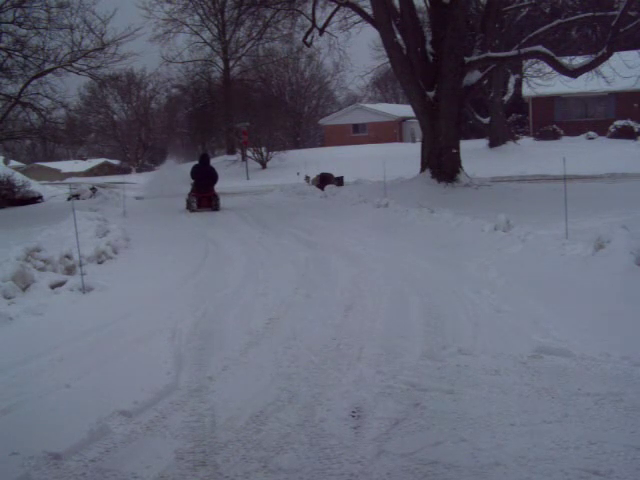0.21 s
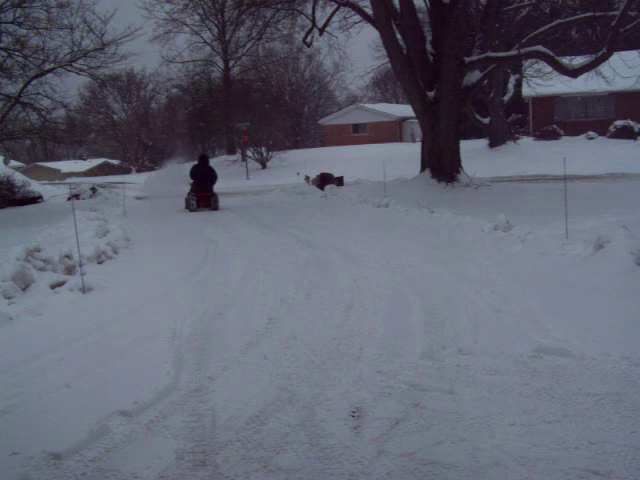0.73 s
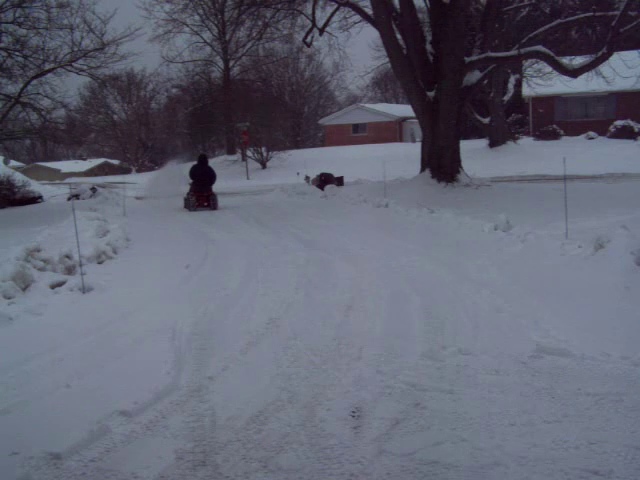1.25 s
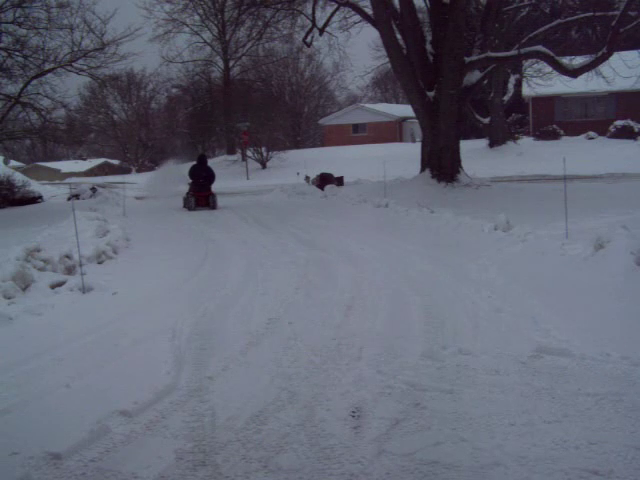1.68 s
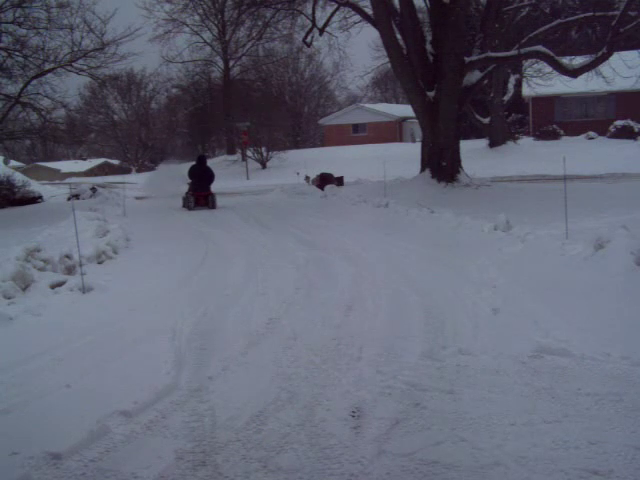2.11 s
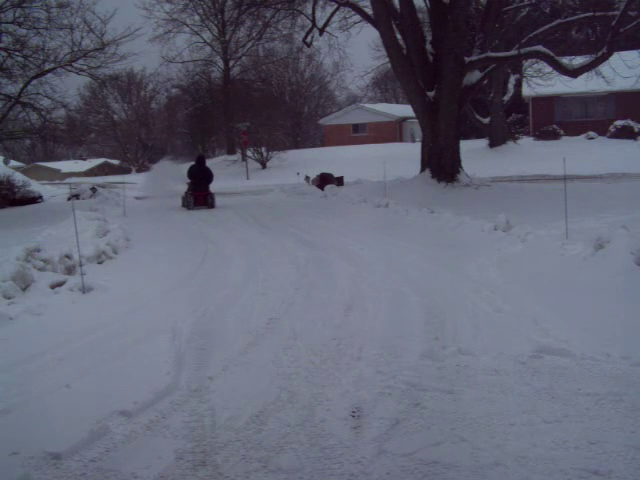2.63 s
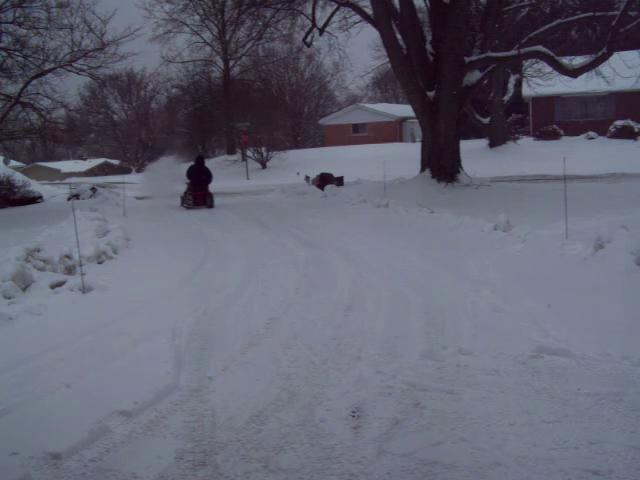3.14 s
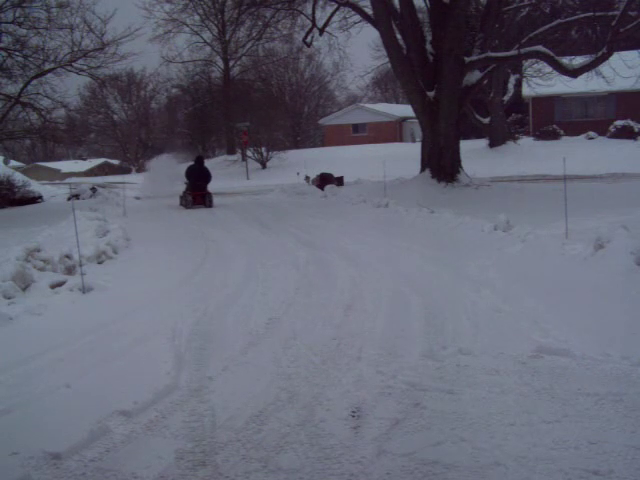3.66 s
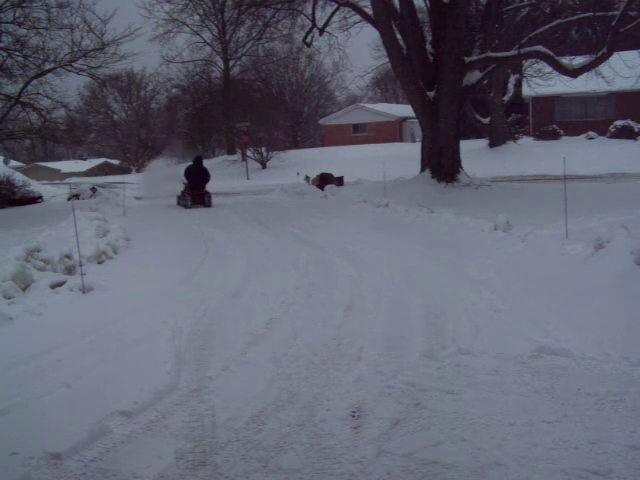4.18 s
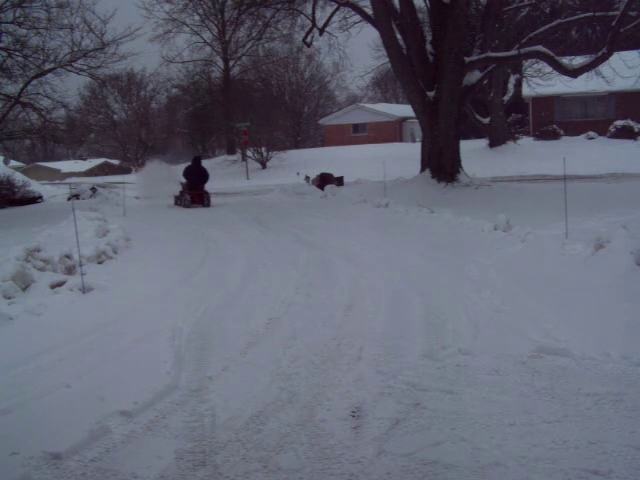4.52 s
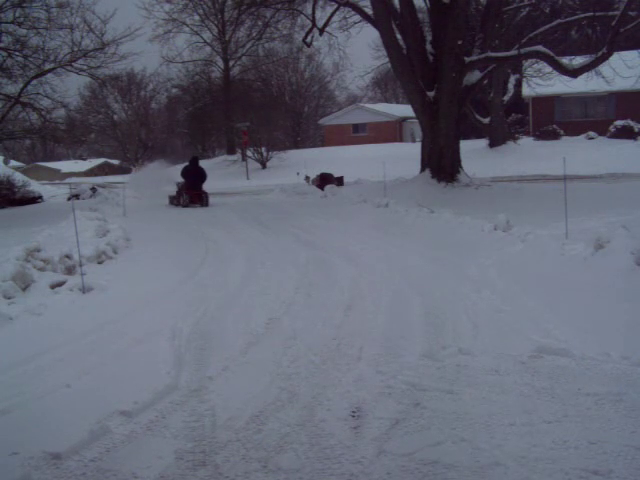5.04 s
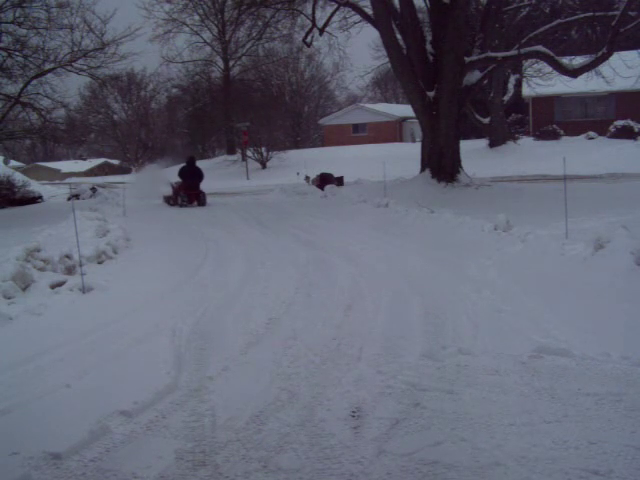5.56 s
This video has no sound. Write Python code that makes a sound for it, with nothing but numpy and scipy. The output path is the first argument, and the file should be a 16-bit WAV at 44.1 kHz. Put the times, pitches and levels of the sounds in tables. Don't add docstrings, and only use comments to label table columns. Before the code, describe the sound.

Distant tractor snowthrower under constant load: buzzing low putter, rushing hiss of thrown snow, small bright ticks, and faint low bumps on a handheld camera.

```python
import sys
import numpy as np
from scipy import signal
from scipy.io import wavfile
from scipy.ndimage import uniform_filter1d

SR = 44100
rng = np.random.default_rng(int(sys.argv[2]) if len(sys.argv) > 2 else 0)


def put_to_file(sound):
    columns = np.atleast_2d(sound).T
    safe = np.clip(columns, -1, 1)
    whole_steps = np.round(safe * 32767)
    wavfile.write(sys.argv[1], SR, whole_steps.astype(np.int16))


def linear_from_db(decibels):
    return 10 ** (np.asarray(decibels, float) / 20)


N = 255339

# start_s [s], speed_rpm [rev/min]
SPEED = [(0.0, 2640.1), (0.15, 2688.1), (0.45, 2709.2), (0.75, 2694.0), (0.9, 2721.0), (1.65, 2711.0),
         (1.95, 2723.3), (2.4, 2686.1), (3.0, 2746.9), (3.15, 2735.3), (3.45, 2748.9), (3.75, 2711.8),
         (4.5, 2659.5), (4.8, 2671.4), (5.79, 2672.3)]
START_CYCLE = .025


def crank():
    start_s, speed_rpm = np.transpose(SPEED)
    rpm = np.interp(np.arange(N) / SR, start_s, speed_rpm)
    return START_CYCLE + np.cumsum(rpm) / 120 / SR


# order [multiple of the firing rate], level_db [dB]
FACING = [(1, -37), (2, -28), (3, -29), (4, -11), (5, -13), (6, 0), (7, -3), (8, -3), (9, -13), (10, -11),
          (11, -10), (12, -27), (13, -17), (14, -21), (15, -22), (16, -21), (17, -14), (18, -13), (19, -26),
          (20, -23), (21, -16)]
# order [multiple of the firing rate], level_db [dB]
ASIDE = [(1, -39), (2, -30), (3, -30), (4, -10), (5, -9), (6, 0), (7, -1), (8, -3), (9, -8), (10, -10),
         (11, -9), (12, -18), (13, -19), (14, -15), (15, -16), (16, -21), (17, -22), (18, -20), (19, -23),
         (20, -21), (21, -16)]
STROKES = [
    (1, .021, 0, 0, 0),
    (10, .035, -.27, 0, 0),
    (13, .63, .17, 1, .14),
    (22, 0, 0, 1, 1),
]
# pitch_hz [Hz], width_hz [Hz], lift_db [dB]
PANELS = [(253, 6, 7), (390, 12, 9), (412, 8, 3)]
EXHAUST_DB, EXHAUST_ASIDE_DB = -19, -2
GULP_DB, GULP_ASIDE_DB = -0.33, 0.5
RATTLE_ORDERS, RATTLE_DB = range(22, 31), -27


def engine(cycles):
    aside = np.clip(turned(), 0, 1)
    firing_hz = np.gradient(cycles) * SR
    gulp_db = GULP_DB + GULP_ASIDE_DB * aside
    rattle = [(order, RATTLE_DB) for order in RATTLE_ORDERS]
    slip = .05
    out = np.zeros(N)
    for (order, front_db), (_, side_db) in zip(FACING + rattle, ASIDE + rattle):
        stroke = [row for row in STROKES if row[0] <= order][-1]
        _, place, lag, gulp_share, scatter = stroke
        lag = lag + scatter * rng.standard_normal()
        unsteady = .028 * order
        db = front_db + aside * (side_db - front_db) + gulp_share * gulp_db
        db = db + 1.6 * unsteady * wander(3)
        swell_db = np.zeros(N)
        for pitch_hz, width_hz, lift_db in PANELS:
            swell_db += lift_db / (1 + (2 * (order * firing_hz - pitch_hz) / width_hz) ** 2)
        db += swell_db - swell_db.mean() - 5 * scatter
        if order < 4:
            db -= 3
        turns = order * (cycles - place) - lag + slip * unsteady * wander(4.9)
        out += linear_from_db(db) * np.cos(2 * np.pi * turns)

    charge_db = 0.51 * rng.standard_normal(200)[(cycles + .5).astype(int)]
    level_db = EXHAUST_DB + EXHAUST_ASIDE_DB * aside + uniform_filter1d(charge_db, 400)
    power = uniform_filter1d(uniform_filter1d(out ** 2, SR // 2), SR // 4)
    return linear_from_db(level_db) * out / np.sqrt(power)


TURN_S, TURN_LENGTH_S, TURN_SHARE = 4.1, 0.37, 0.98


def turned():
    u = np.clip((np.arange(N) / SR - TURN_S) / TURN_LENGTH_S + .5, 0, 1)
    return TURN_SHARE * np.sin(np.pi * u / 2) ** 2


# pitch_hz [Hz], level_db [dB per Hz]
HISS_COLOUR = [(700, -27.5), (1000, -13.5), (1500, -12), (2300, -12), (3300, -10), (4600, -13),
               (5800, -20.5), (7800, -33.5), (8700, -51), (9100, -74.5)]
# pitch_hz [Hz], width_hz [Hz], lift_db [dB above the hiss]
HOUSING = [(1020, 60, 3), (1225, 70, 5), (1955, 60, 6), (2760, 220, 4), (7100, 300, 3)]
PUFFS = [(.94, .04, 1.42), (.29, 0.074, .8), (.7, .15, 0.27)]
HISS_DB, HISS_RISE_DB_PER_S, HISS_ASIDE_DB = -18.5, 0.04, .5


def hiss(cycles):
    sizes = linear_from_db(4 * rng.standard_normal((200, len(PUFFS))))
    gate = np.zeros(N)
    for k, (place, width, strength) in enumerate(PUFFS):
        shifted = cycles - place + 1.5
        shape = np.exp(-((shifted % 1 - .5) / width) ** 2)
        gate += strength * sizes[shifted.astype(int), k] * shape
    steady = yard(noise(HISS_COLOUR, HOUSING, patchy_db=0.7))
    highpass = signal.butter(2, 8200, "high", fs=SR, output="sos")
    treble = signal.sosfiltfilt(highpass, steady)
    puffed = steady * (1 + .13 * gate + .07 * wander(250))
    puffed += treble * (1.2 * gate + .4 * wander(130))
    level_db = HISS_DB - 5.0 + HISS_RISE_DB_PER_S * np.arange(N) / SR + HISS_ASIDE_DB * turned()
    return linear_from_db(level_db) * evened(puffed)


IMPELLER_HZ, IMPELLER_DB = 301.8, -38


def impeller():
    hz = IMPELLER_HZ + 1.3 * wander(3.6)
    level_db = IMPELLER_DB + 3.0 - 4.5 * turned() + 1.4 * wander(4.5)
    return linear_from_db(level_db) * np.sin(2 * np.pi * np.cumsum(hz) / SR)


# start_s [s], level_db [dB peak], pitch_hz [Hz]
TICKS = [(0.0992, -23, 6330), (0.1436, -23, 7200), (0.2593, -27, 7200), (0.3056, -26, 6100),
         (0.6166, -32, 6300), (1.7689, -24, 6130), (2.1405, -24, 6300), (2.2528, -27, 6120),
         (2.541, -29, 6120), (2.718, -19.5, 6570), (3.139, -26, 6000), (3.3578, -24, 6100),
         (3.418, -29.5, 6150), (3.4887, -26.5, 6150), (3.7973, -27, 6030), (4.6468, -29.5, 6250),
         (4.6943, -23, 6200), (5.0423, -25, 5970), (5.0908, -22.5, 5850), (5.1397, -21.5, 6080),
         (5.189, -20, 6100), (5.2894, -26, 6970), (5.5327, -29.5, 6290), (5.682, -19.5, 6200)]


def chain():
    out = np.zeros(N)
    t = np.arange(700) / SR
    scratch = rng.standard_normal((len(TICKS), 700))
    band = signal.butter(3, [4600, 7300], "band", fs=SR, output="sos")
    shape = (1 - np.exp(-t / .0008)) * linear_from_db(-60 * t / .024)
    for (start_s, level_db, pitch_hz), grit in zip(TICKS, scratch):
        ring = np.sin(2 * np.pi * pitch_hz * t)
        grit = signal.sosfilt(band, grit)
        add(out, start_s, linear_from_db(level_db - 1) * shape * (.6 * ring + 1.2 * grit))
    return out


# pitch_hz [Hz], level_db [dB per Hz]
RUMBLE_COLOUR = [(20, -22), (45, -16), (70, -14), (150, -2), (300, -4.5), (480, -4), (700, -2.5), (780, -8),
                 (1100, -20)]
RUMBLE_DB, RUMBLE_FALL_DB_PER_S = -33.5, 0.64


def rumble():
    level_db = RUMBLE_DB + 2 - RUMBLE_FALL_DB_PER_S * np.arange(N) / SR
    return linear_from_db(level_db) * yard(noise(RUMBLE_COLOUR, [], patchy_db=1.0))


# start_s [s], level_db [dB peak], pitch_hz [Hz], length_s [s]
BUMPS = [(.0, -36, 40, .04), (.17, -38, 20, .05), (.39, -40, 35, .08), (.53, -42, 40, .03),
         (1.22, -35, 41, .1), (1.416, -26, 72, 0.055), (1.46, -35, 35, .07), (2.025, -40, 45, .03),
         (2.52, -43, 22, .06), (3.0, -40, 45, .03), (3.31, -38, 45, .03), (4.6, -40, 40, .035),
         (5.136, -39, 45, .03)]


def bumps():
    out = np.zeros(N)
    for start_s, level_db, pitch_hz, length_s in BUMPS:
        t = np.arange(0, length_s, 1 / SR)
        push = np.sin(np.pi * t / length_s) ** 2
        add(out, start_s, linear_from_db(level_db + 1.0) * push * np.cos(2 * np.pi * pitch_hz * (t - length_s / 2)))
    return out


YARD_S, YARD_DB = .07, -19


def yard(x):
    taps = np.zeros(SR // 8)
    places = (rng.uniform(.05, 1, 9) * YARD_S * SR).astype(int)
    taps[places] = linear_from_db(YARD_DB) * rng.choice([-1, 1], 9)
    taps[0] = 1
    return signal.oaconvolve(x, taps / np.linalg.norm(taps))[:N]


def noise(colour, peaks, patchy_db):
    hz = np.fft.rfftfreq(1024, 1 / SR)
    colour_hz, colour_db = np.transpose(colour)
    db = np.interp(np.log(hz + 1), np.log(colour_hz), colour_db, left=-90, right=-120)
    for pitch_hz, width_hz, lift_db in peaks:
        db = db + lift_db / (1 + (2 * (hz - pitch_hz) / width_hz) ** 2)
    a, b, patches = rng.standard_normal((N // 256 + 5, 513, 3)).T
    patches = evened(uniform_filter1d(uniform_filter1d(patches, 10, 0), 12, 1))
    spectra = (a + 1j * b) * linear_from_db(db[:, None] + patchy_db * patches)
    return evened(signal.istft(spectra, nperseg=1024, noverlap=768)[1][:N])


def wander(rate_hz):
    smooth = max(int(SR / 64 / rate_hz), 1)
    coarse = uniform_filter1d(rng.standard_normal(N // 64 + 2), smooth)
    return np.interp(np.arange(N) / 64, np.arange(len(coarse)), evened(coarse))


def evened(x):
    return x / np.sqrt(np.mean(x ** 2) + 1e-20)


def add(mix, start_s, sound):
    part = mix[round(start_s * SR):][:len(sound)]
    part += sound[:len(part)]


def scene():
    cycles = crank()
    machine = engine(cycles) + hiss(cycles) + impeller() + chain() + rumble()
    return (machine + bumps())[None]


def top_cut(x):
    return signal.sosfilt(signal.butter(12, 8920, fs=SR, output="sos"), x)


PORT_HZ, PORT_WIDTH_HZ, PORT_DB = 3927, 435, 12


def record(dry):
    b, a = signal.iirpeak(PORT_HZ, PORT_HZ / PORT_WIDTH_HZ, SR)
    ported = dry + (linear_from_db(PORT_DB) - 1) * signal.lfilter(b, a, dry)
    opening = np.arange(1, N + 1) / 4
    closing = np.arange(N)[::-1] / 3
    ported *= np.minimum(np.minimum(closing, opening), 1)
    return top_cut(ported)


dry = scene()
out = record(dry)
put_to_file(out)
```